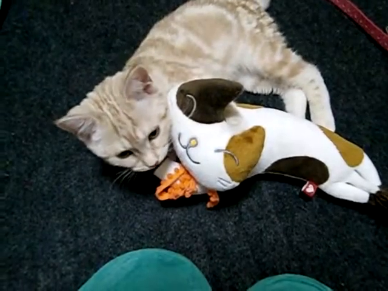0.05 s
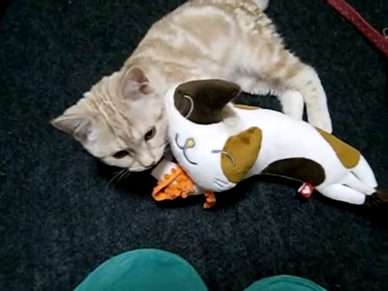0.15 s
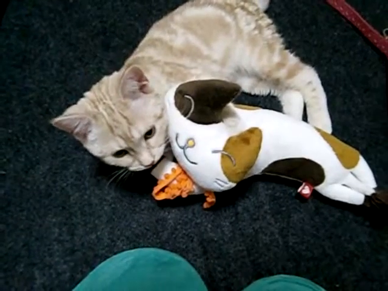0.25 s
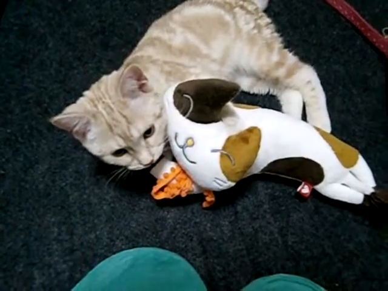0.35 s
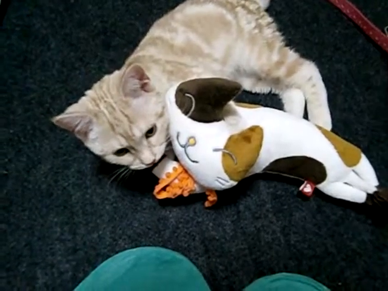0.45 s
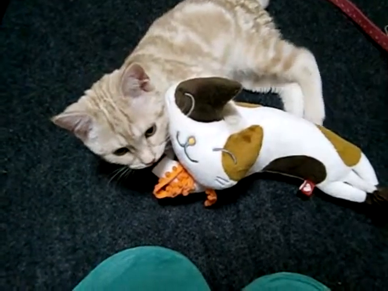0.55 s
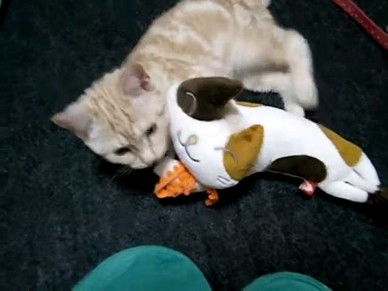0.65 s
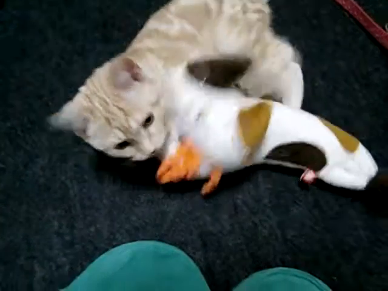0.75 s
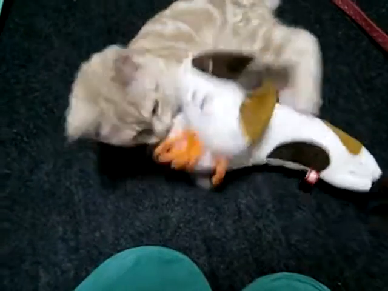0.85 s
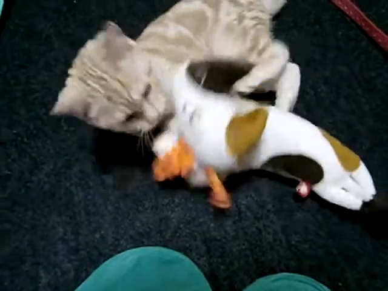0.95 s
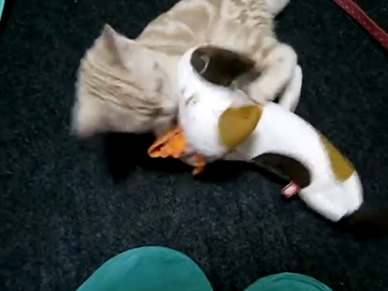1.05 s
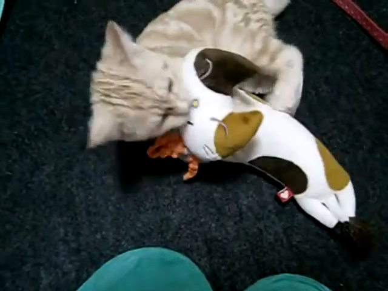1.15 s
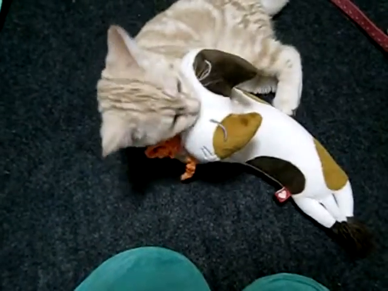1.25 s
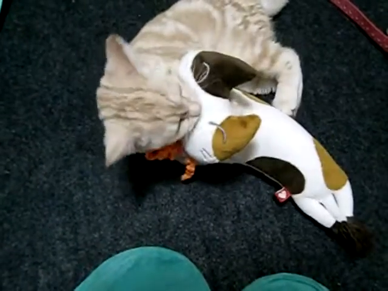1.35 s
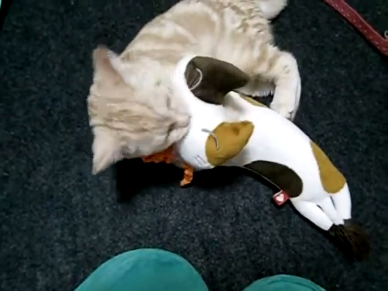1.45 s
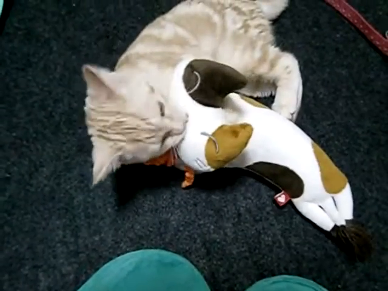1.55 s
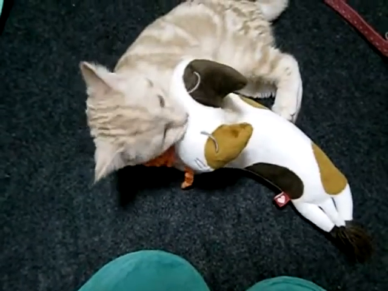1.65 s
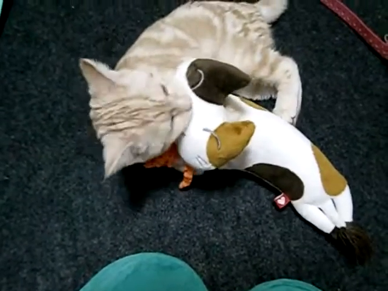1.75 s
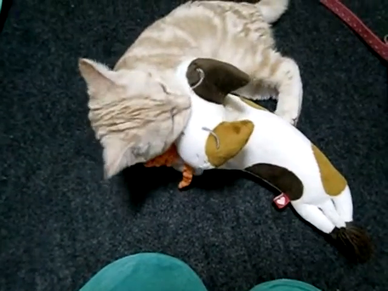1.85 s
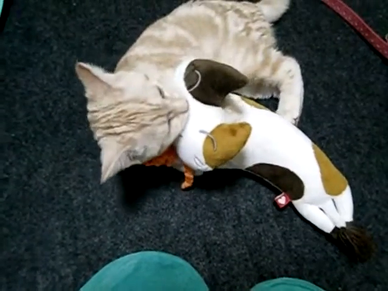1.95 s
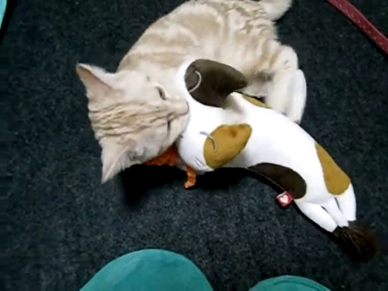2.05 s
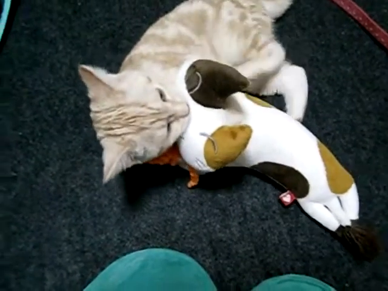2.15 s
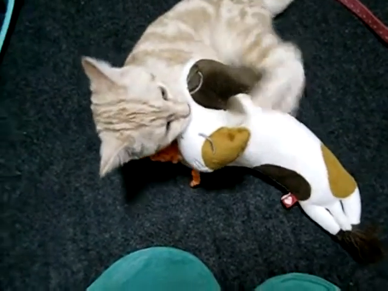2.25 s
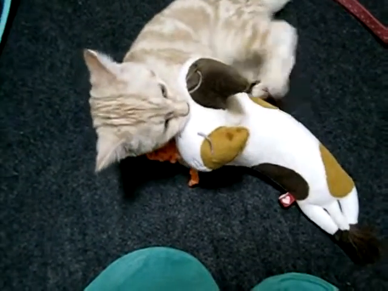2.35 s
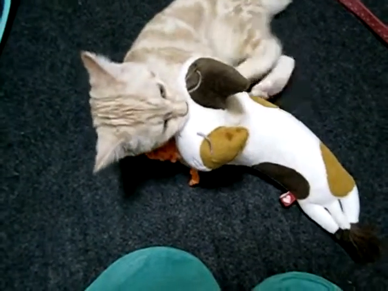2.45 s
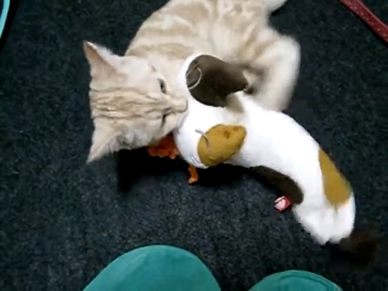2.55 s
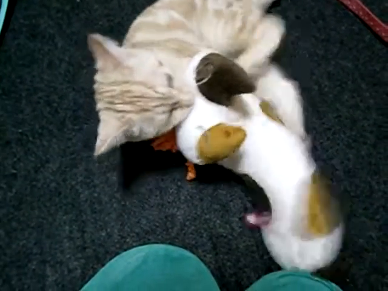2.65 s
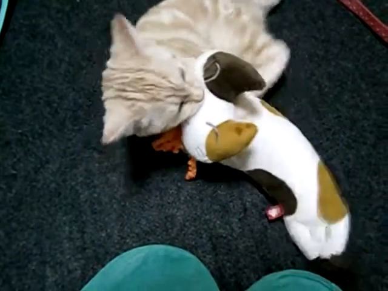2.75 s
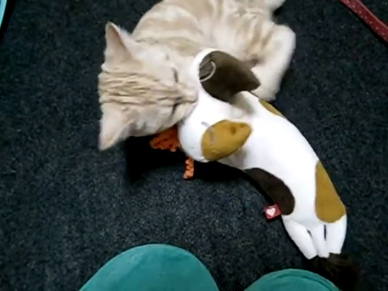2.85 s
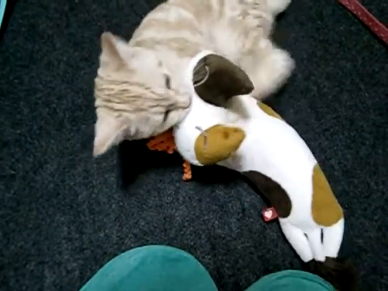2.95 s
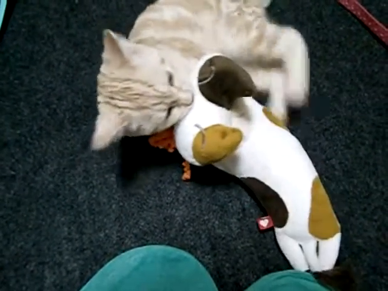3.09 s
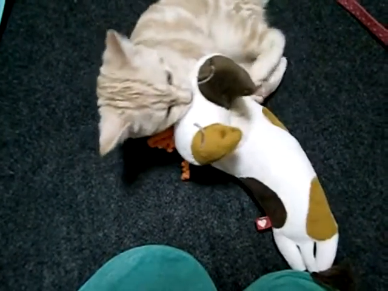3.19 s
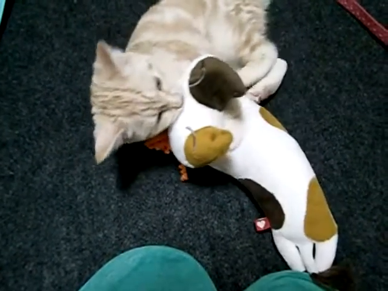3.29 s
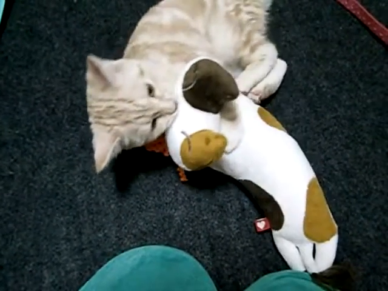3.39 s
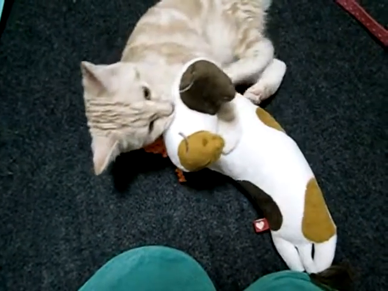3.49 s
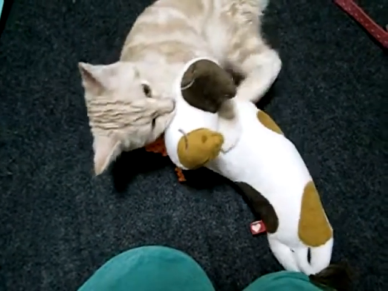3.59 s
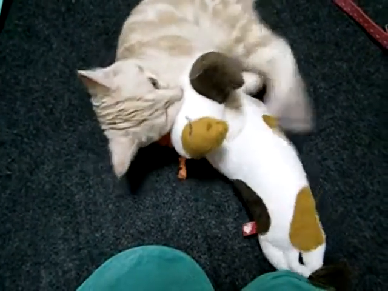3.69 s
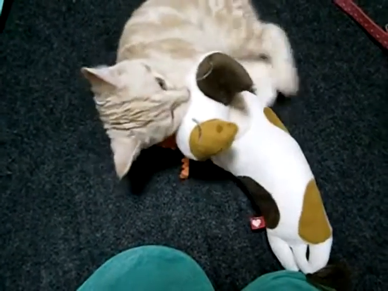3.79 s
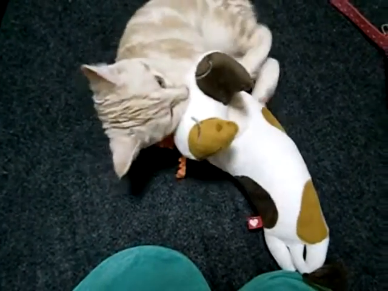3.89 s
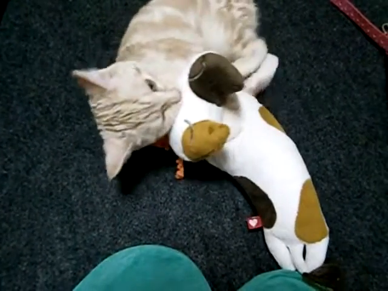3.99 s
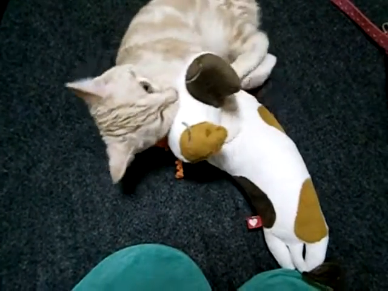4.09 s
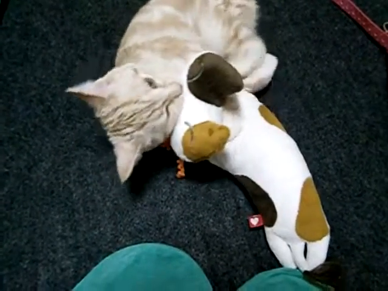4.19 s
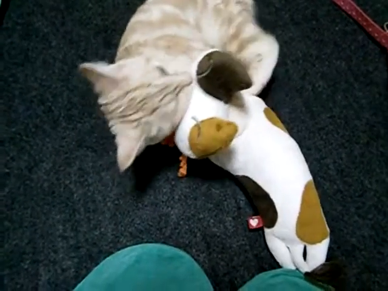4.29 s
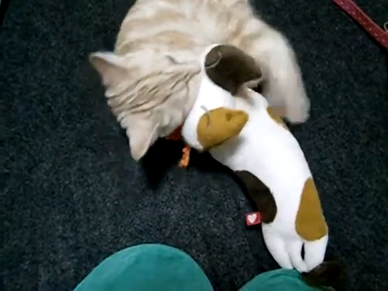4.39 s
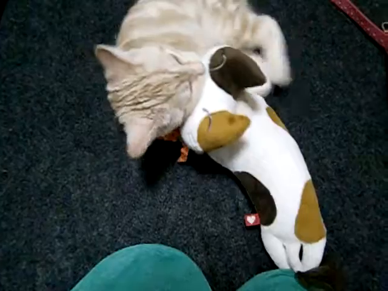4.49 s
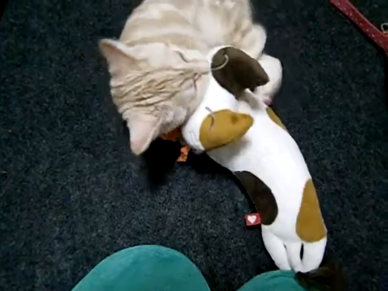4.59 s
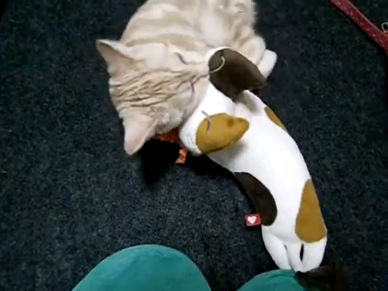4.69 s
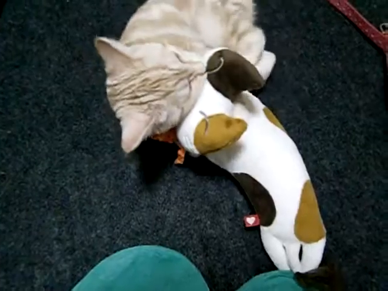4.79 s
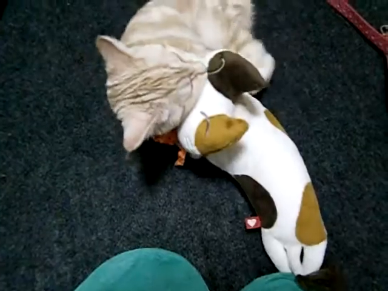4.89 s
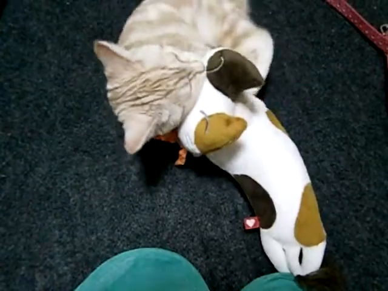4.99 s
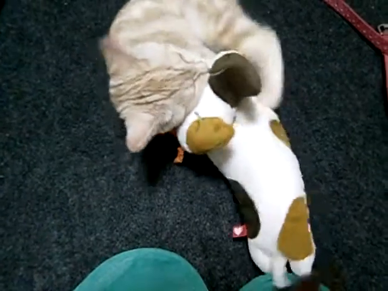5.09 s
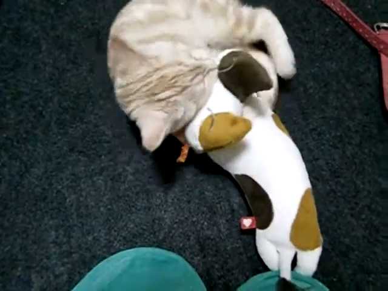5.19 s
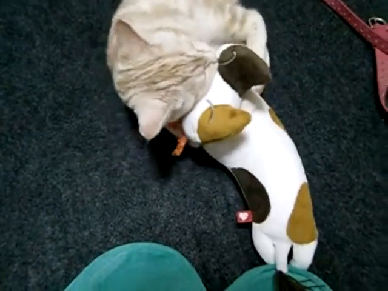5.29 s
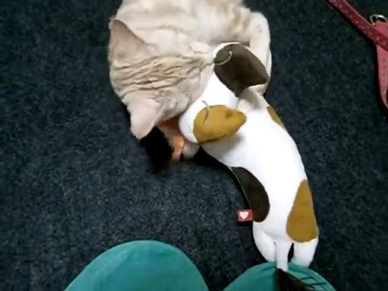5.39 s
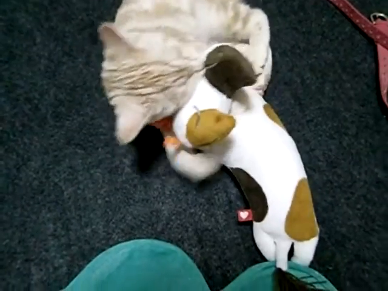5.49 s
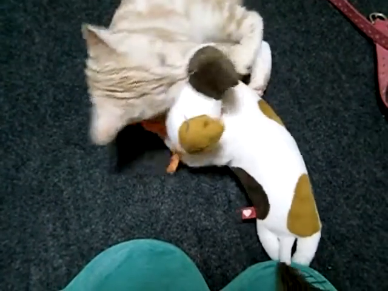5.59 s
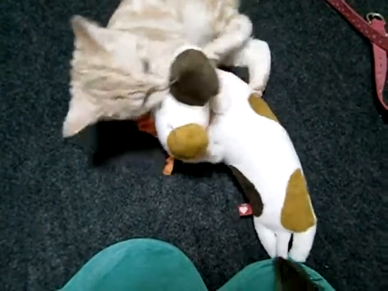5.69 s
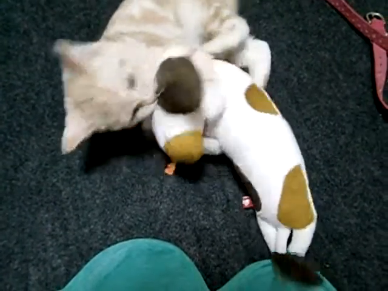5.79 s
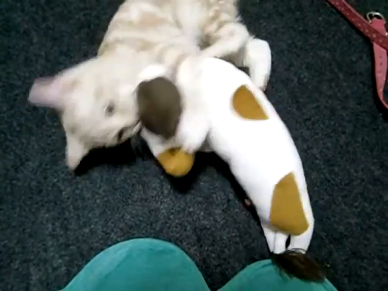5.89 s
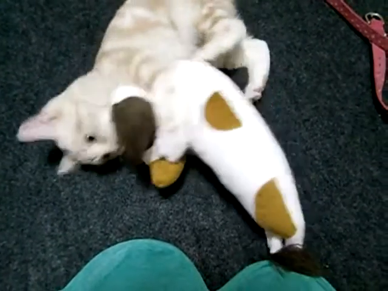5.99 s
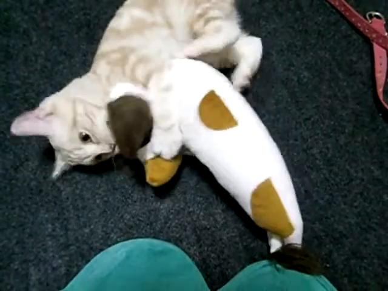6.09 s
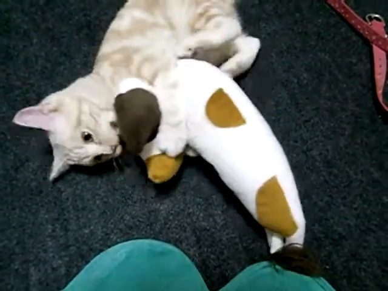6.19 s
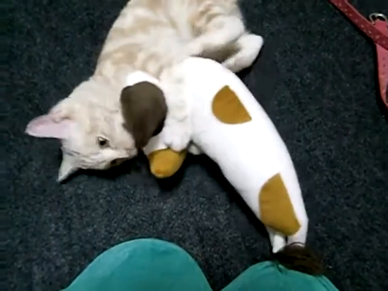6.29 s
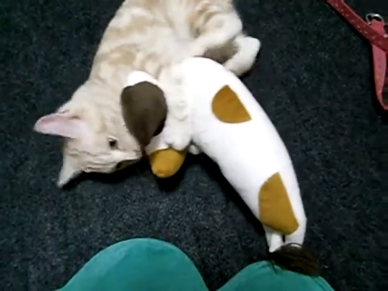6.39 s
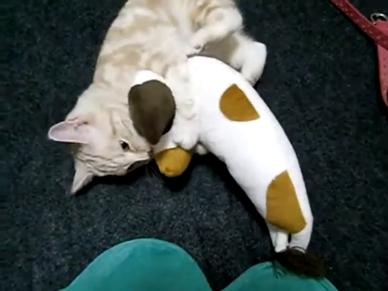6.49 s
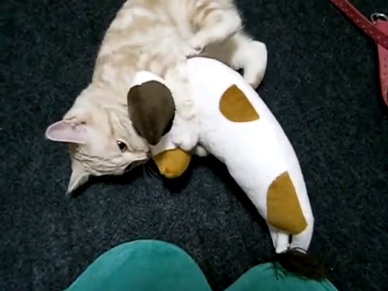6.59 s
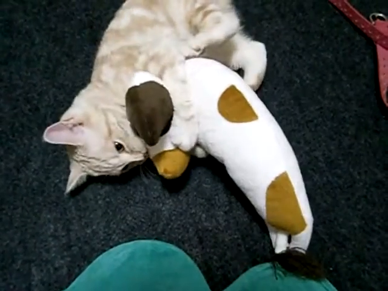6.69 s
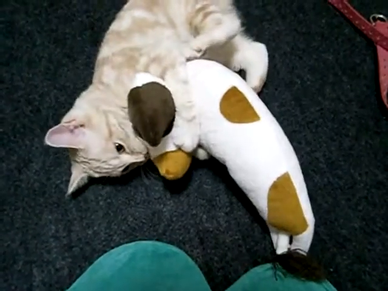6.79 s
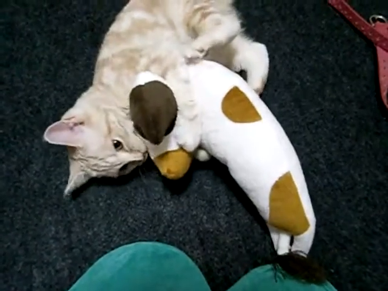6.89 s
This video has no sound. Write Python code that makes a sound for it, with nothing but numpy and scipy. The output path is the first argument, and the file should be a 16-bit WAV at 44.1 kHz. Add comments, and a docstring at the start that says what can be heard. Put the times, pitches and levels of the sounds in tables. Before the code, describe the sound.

Close, dry indoor sound: a tiny slotted bell with a loose pellet gives short, high metallic jingles, each dying almost at once. After near silence comes a light shake, a longer gap, then two loud rattles in quick succession and several smaller ones. Faint low paw thumps touch the plush toy. Steady soft room rumble and hiss lie underneath, and the bell fades to tiny ticks.

```python
"""A quiet room murmurs and hisses, then a small slotted jingle bell, muffled by fur and cloth, jingles in bursts:
a kitten wrestles a plush toy on a carpet. The bell is a bank of dying sines, struck by single blows of its
pellet and by random small contacts as the pellet rolls. Paws thump the toy with short low rings.
Sparse reflections follow bell and paws; shaped noise makes the room and the microphone hiss."""
import sys
import numpy as np
from scipy import signal
from scipy.fft import rfft, irfft
from scipy.io import wavfile

SR = 44100
rng = np.random.default_rng(int(sys.argv[2]) if len(sys.argv) > 2 else 0)


def pcm_store(signal):
    """Save signal as 16-bit PCM."""
    levels = np.round(np.clip(np.atleast_2d(signal), -1, 1) * 32767)
    wavfile.write(sys.argv[1], SR, levels.astype(np.int16).T)


def magnitude_from_level(level_db):
    """Linear magnitude for a level in decibels (20 dB per decade)."""
    exponent = np.asarray(level_db, float) / 20
    return 10 ** exponent


N = 306318  # length in samples

# tone colour of the room noise before it is set to its level: f/Hz, relative level/dB
ROOM_COLOUR = [(15, -73), (25, -4), (90, -6.5), (120, -2), (165, -3), (320, -12), (450, -11), (600, -13.5),
               (1400, -19.5), (5000, -27), (15900, -28.5)]


def room_tone(rms_db=-56):
    """Steady low murmur of the house and hiss of the microphone: white noise shaped in frequency."""
    hz, db = np.transpose(ROOM_COLOUR)
    f = np.fft.rfftfreq(N, 1 / SR)
    colour_db = np.interp(np.log(f + 1), np.log(hz + 1), db)
    noise = irfft(rfft(rng.standard_normal(N)) * magnitude_from_level(colour_db), N)
    return magnitude_from_level(rms_db) * noise / noise.std()


def ring(clicks, hz, t60):
    """A resonant mode: every click starts a sine that scales with it and dies by 60 dB in t60 seconds."""
    pole = np.exp(2j * np.pi * hz / SR - np.log(1000) / (t60 * SR))
    return signal.lfilter([1], [1, -pole], clicks).imag


# blows of the pellet: t/s, strength level/dB, spot around the shell (0-7, a full turn), knock level/dB
PELLET_BLOWS = [(0.796, -21.5, 5.47, -30), (0.8193, -17.5, 2.74, -28), (0.8472, -28, 3.66, -32.5),
                (0.888, -28.5, 2.25, -58.0), (0.9005, -26, 6.7, -37), (0.917, -27.5, 5.1, -38.0),
                (0.9593, -17.0, 0.42, -48.0), (0.9664, -34, 2.0, -35.0), (0.9799, -20.5, 4.48, -44),
                (1.024, -35, 5.2, -36.5), (1.0385, -18.5, 2.48, -35.0), (1.096, -31, 4, -42),
                (1.1215, -29.0, 6.33, -36), (1.1992, -37.5, 6.2, -40.5), (1.2211, -40, 2.7, -38.5),
                (2.6257, -40, 4.0, -37), (2.6415, -23.5, 2.0, -31), (2.6498, -21, 5.9, -32.5),
                (2.6696, -16, 6.3, -51), (2.682, -17, 3.67, -40.0), (2.6902, -15.5, 4.6, -26),
                (2.6973, -1.5, 6.37, -33), (2.7096, -11, 5.2, -43), (2.7181, -12.5, 3.1, -43.0),
                (2.7221, -14, 3.57, -53.0), (2.7366, -13.5, 6.0, -28.5), (2.751, -25, 5.6, -38),
                (2.789, -25, 1.5, -32), (2.819, -30.5, 4.8, -50.0), (2.8413, -22, 3.74, -51),
                (2.8962, -26.0, 4.8, -50), (3.0135, -27, 5.55, -29.5), (3.0521, -12, 2.58, -44),
                (3.061, -14.5, 2.35, -27.5), (3.0654, -5.0, 2.43, -26.5), (3.0937, -12.0, 6.9, -55),
                (3.1038, -13.0, 1.6, -28), (3.1094, -2, 6.38, -37), (3.129, -11.5, 0.21, -37),
                (3.1495, -13.5, 2.57, -44), (3.159, -28.5, 1.0, -43), (3.1764, -20, 3.21, -56),
                (3.2073, -22.5, 3.5, -45), (3.2119, -14, 3.61, -38.0), (3.2371, -28, 0.18, -43),
                (3.366, -26.5, 3.65, -61), (3.4237, -30, 4.52, -57.0), (3.5229, -36, 4.25, -80.0),
                (3.738, -22.5, 2.9, -43), (3.7492, -32, 6, -33), (3.7554, -21.5, 0.1, -54.0),
                (3.7707, -23, 6.2, -29.5), (3.7763, -11.5, 0.091, -38), (3.8032, -16.0, 3.66, -39.0),
                (3.8317, -9.5, 3.7, -32.5), (3.8657, -22, 6.7, -58.0), (3.9205, -39, 6.0, -37.5),
                (3.952, -35, 6.6, -41.5), (4.097, -44.5, 5.3, -68.0), (4.463, -22.5, 6.46, -33.5),
                (4.4975, -20, 3.33, -33.0), (4.5872, -35, 5.3, -36.5), (4.6463, -28.0, 6.53, -57.0),
                (4.7093, -41, 5.55, -65.0), (4.787, -37, 6.55, -69.0), (5.061, -33.5, 5.4, -32.0),
                (5.101, -27.0, 6.6, -35.5), (5.1182, -30, 7, -30.0), (5.1247, -15.0, 6.3, -41.0),
                (5.1318, -16, 1.7, -48), (5.136, -18, 0.18, -39), (5.147, -15.5, 2.71, -51.0),
                (5.163, -22, 1.7, -49), (5.194, -25, 4.25, -37.5), (5.2136, -27, 2.9, -36),
                (5.266, -22.5, 6.6, -36), (5.2903, -37, 5.0, -51.0), (5.2944, -15.0, 3.67, -41),
                (5.323, -25.5, 6.9, -40.5), (5.368, -26.0, 2.47, -54.0), (5.7217, -53, 6.9, -67.0),
                (5.8233, -39.5, 0.56, -66.0), (5.909, -35.0, 4.7, -69.0), (5.94, -33.0, 0.3, -68),
                (5.9724, -31, 4.5, -63.0), (6.0924, -34.5, 1.3, -64.0), (6.2043, -33, 4.26, -61),
                (6.3035, -46, 1.07, -71.0), (6.48, -53, 3.8, -70.0), (6.7248, -49, 3.25, -61.0)]
# what a blow at each of seven spots (rows 0 to 6 around the shell) adds to the mode families:
# main ring level/dB, clink level/dB, upper ring level/dB, top ring level/dB
SHELL_SPOTS = [(-1.5, -27, -12, -25), (-17, -27, 1, -22), (-25.5, -7, -26, 5), (2, -22.5, -22.5, -29),
               (-19.5, -36, -11.5, 6), (1, -10.5, 0, -16.5), (-19, 1, -23, -26)]


def blow_levels():
    """Drive of the five mode families (dB) for every blow: the spot that is hit decides which modes ring."""
    _, strength_db, spot, knock_db = np.transpose(PELLET_BLOWS)
    turn = len(SHELL_SPOTS)
    ring_db = [strength_db + np.interp(spot, np.arange(turn), spot_db, period=turn)
               for spot_db in np.transpose(SHELL_SPOTS)]
    return ring_db + [knock_db]


def blow_samples():
    """Sample at which the pellet lands each blow."""
    return np.round(np.transpose(PELLET_BLOWS)[0] * SR).astype(int)


# shakes of the toy that set the pellet rolling: start t/s, end t/s, start level/dB, end level/dB
TOY_SHAKES = [(.8, 1.261, -47.5, -53.5), (2.649, 3.0, -41, -48.5), (3.022, 3.409, -42, -51),
              (3.504, 3.68, -57, -59), (3.731, 4.006, -45, -56.5), (4.082, 4.173, -53, -58),
              (4.412, 4.798, -47.5, -57.5), (5.065, 5.416, -47.5, -52), (5.724, 5.88, -51.5, -56.5),
              (5.898, 6.133, -52, -49.5), (6.196, 6.294, -49.5, -53)]


def rolling_db(settle_db_per_s=600, rebound_db=-20.5, rebound_t60=0.11):
    """How hard the pellet rolls (dB): power from the shakes, plus rebounds that die away after each blow."""
    t = np.arange(N) / SR
    blow_power = np.zeros(N)
    blow_power[blow_samples()] = (magnitude_from_level(blow_levels()) ** 2).sum(0)
    decay = magnitude_from_level(-2 * 60 / (rebound_t60 * SR))  # power kept from one sample to the next
    power = signal.lfilter([magnitude_from_level(2 * rebound_db)], [1, -decay], blow_power)
    for start, end, *db in TOY_SHAKES:
        # rolling builds up before a shake and dies after it at the same rate
        outside_s = np.maximum(np.maximum(start - t, t - end), 0)
        shake_db = np.interp(t, [start, end], db) - settle_db_per_s * outside_s
        power += magnitude_from_level(2 * shake_db)
    return 10 * np.log10(power + 1e-12)


def rolling_contacts(calm_per_s=220, wild_per_s=900, calm_db=-55, wild_db=-36, spread_db=2.5):
    """Random small contacts of the pellet, larger and denser the harder it rolls."""
    size_db = rolling_db()
    per_s = np.interp(size_db, [calm_db, wild_db], [calm_per_s, wild_per_s])
    touches = rng.random(N) < per_s / SR
    luck = np.minimum(rng.exponential(1, N), 3)
    return magnitude_from_level(size_db + spread_db * (luck - 2)) * touches


# modes of the bell in five families (main ring, clink, upper ring, top ring, knock): f/Hz, level/dB, t60/s
BELL_MODES = [
    [(4757, -2, .052), (4600, -16, .02), (5300, -15, .012), (3530, -39, .06)],
    [(9345, -2.5, .018), (9550, -7, .016), (7990, -31, .07)],
    [(11482, -1, .03), (12050, -8, .014)],
    [(13097, -9.5, .065), (14025, -12, .024), (8495, -24, .06)],
    [(2093, 2, 0.0026), (1214, -4, 0.0047), (3420, -5, 0.0036), (555, -8, 0.0025), (7120, -2, 0.0023),
     (15100, -5, 0.0025), (11880, -4.5, 0.0038)],
]
# how rolling drives the five families, before the knock's extra rattle: level/dB, one per family
ROLL_DRIVE = [-9, -15, -8.5, -6, -6.5]
# air in the shell, a broad short ring that stands out in soft contacts: f/Hz, t60/s,
# level/dB at a main-ring drive of 0 dB, growth in dB per dB of that drive, rolling level/dB
SHELL_AIR = (4930, .013, -17, .5, 1.5)


def bell(scatter_db=1.5, weak_scatter=.35, contact_s=.0008, rattle_from_db=-41, rattle_growth=0.3):
    """Blows and rolling contacts ring every mode of shell and air; each blow has its own luck per mode."""
    at, family_db, contacts = blow_samples(), blow_levels(), rolling_contacts()
    mode_count = 1 + sum(map(len, BELL_MODES))
    # one draw for the strength and one for the sign
    luck = np.tanh(rng.standard_normal((len(at), 2, mode_count)))
    t = np.arange(128) / SR
    push = np.sin(np.pi * np.minimum(t / contact_s, 1)) ** 2

    def mode(index, hz, t60, blow_db, roll_db, luck_db):
        """The contact lasts a moment, so the ring swells over its first cycles."""
        clicks = magnitude_from_level(roll_db) * contacts * rng.standard_normal(N)
        blow_gain = magnitude_from_level(blow_db + luck_db * luck[:, 0, index])
        clicks[at] += blow_gain * np.sign(luck[:, 1, index])
        swell = push / push.sum() * np.exp(2j * np.pi * hz * t)
        return ring(signal.oaconvolve(clicks, swell)[:N], hz, t60)

    hz, t60, base_db, growth, roll_db = SHELL_AIR
    out = mode(0, hz, t60, base_db + growth * family_db[0], roll_db, scatter_db)

    # in hard rolling the knock grows faster than the other families
    rattle_db = rattle_growth * np.maximum(rolling_db() - rattle_from_db, 0)
    drive_db = ROLL_DRIVE[:-1] + [ROLL_DRIVE[-1] + rattle_db]
    index = 0
    for modes, blow_db, roll_db in zip(BELL_MODES, family_db, drive_db):
        for hz, db, t60 in modes:
            index += 1
            # the weaker a mode, the more its level varies from blow to blow
            luck_db = scatter_db - weak_scatter * db
            out += magnitude_from_level(db) * mode(index, hz, t60, blow_db, roll_db, luck_db)
    return out


def walls(x, t60=0.03, delay_s=.003):
    """A short tail of sparse reflections from floor and furniture: random-sign taps that die away."""
    taps = np.zeros(SR // 4)
    slots = np.arange(0, SR // 4 - 20, 20)  # one reflection in every 20 samples
    taps[slots + rng.integers(0, 20, len(slots))] = rng.choice([-1., 1.], len(slots))
    t = np.arange(len(taps)) / SR
    taps *= magnitude_from_level(-60 * t / t60) * (t > delay_s)
    return signal.oaconvolve(x, taps / np.linalg.norm(taps))[:N]


# thumps of the paws: t/s, click level/dB, f/Hz of the main ring
PAW_THUMPS = [(3.72, -35.5, 410), (4.411, -37, 447), (4.42, -42.5, 393), (6.108, -40, 796)]


def paws(t60=0.012, weight_hz=170, weight_db=-5, weight_t60=0.026, scuff_db=-7, claw_db=-4, claw_t60=.003):
    """Soft dull thumps on the stuffed toy: short rings for body, push into the floor, cloth scuff and claw."""
    out = np.zeros(N)
    for s, db, hz in PAW_THUMPS:
        click = magnitude_from_level(db) * (np.arange(N) == round(s * SR))
        body = ring(click, hz, t60)
        weight = magnitude_from_level(weight_db) * ring(click, weight_hz, weight_t60)
        scuff = magnitude_from_level(scuff_db) * ring(click, 1.9 * hz, t60)
        claw = magnitude_from_level(claw_db) * ring(click, 3.6 * hz, claw_t60)
        out += scuff + claw - body - weight
    return out


def scene():
    """Bell and paws, their reflections 10 dB down, and the room."""
    near = bell() + paws()
    reflections = magnitude_from_level(-10) * walls(near)
    return (near + reflections + room_tone())[None]


def top_cut(x):
    """Nothing passes above the cut-off."""
    return signal.sosfilt(signal.butter(12, 16510, fs=SR, output="sos"), x)


def record(dry):
    """The band limit of the recorder: a steep low-pass at 16 kHz."""
    edge = signal.firwin(255, 16000, window=("kaiser", 8), fs=SR)
    mix = signal.oaconvolve(dry, edge[None], "same")
    return top_cut(mix)


dry = scene()
out = record(dry)
pcm_store(out)
```